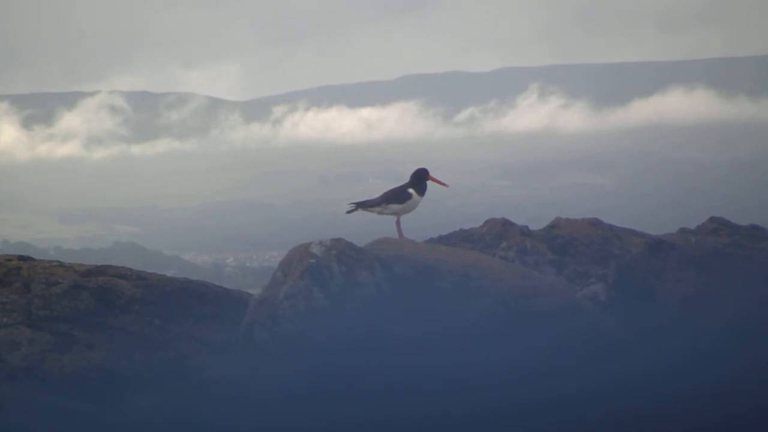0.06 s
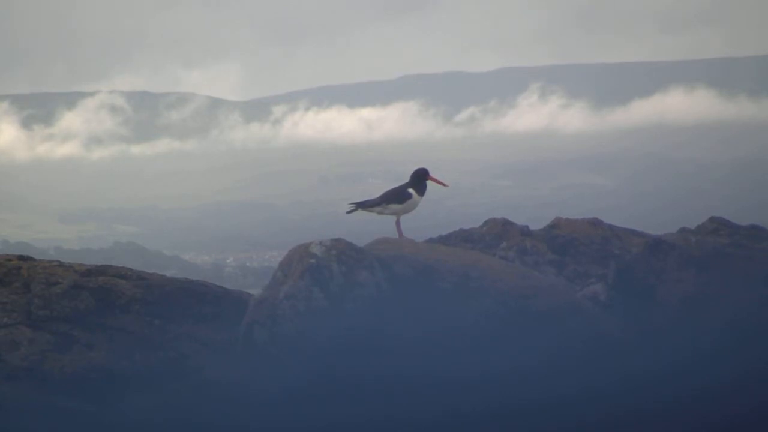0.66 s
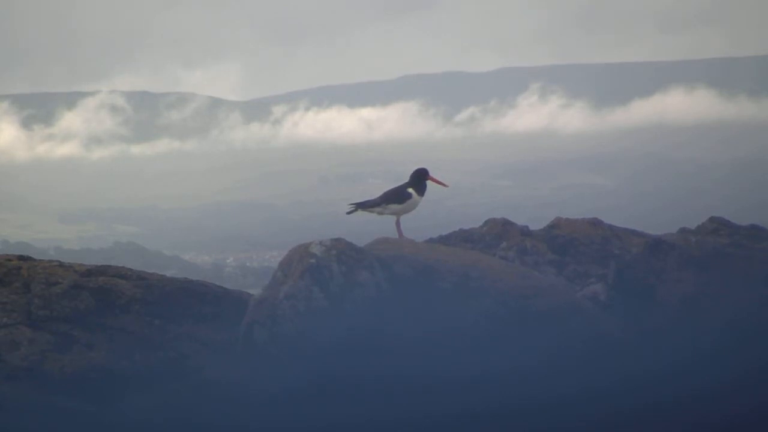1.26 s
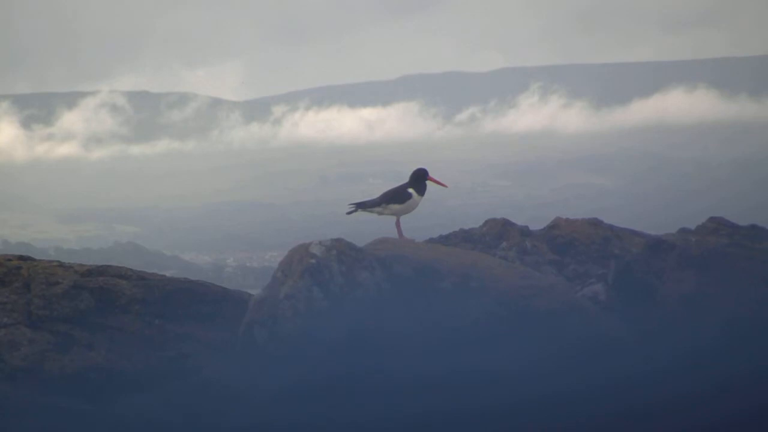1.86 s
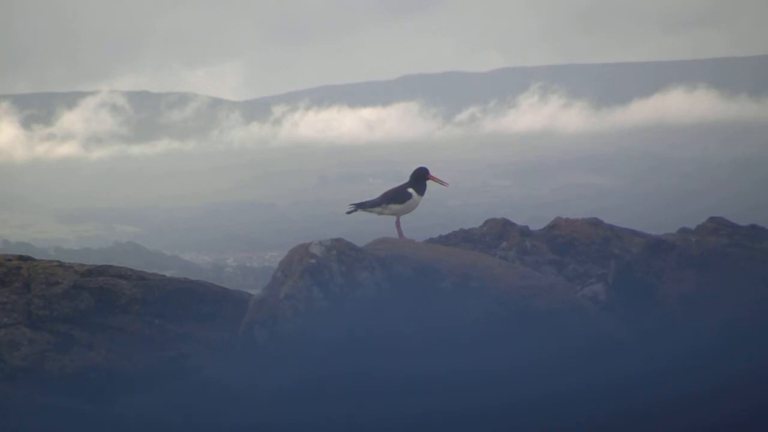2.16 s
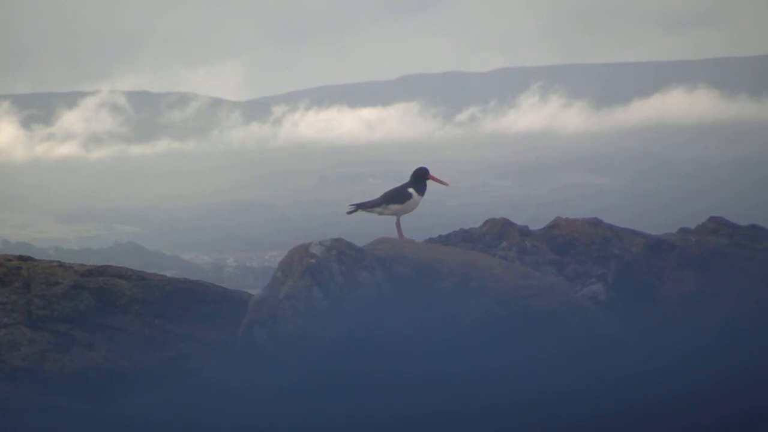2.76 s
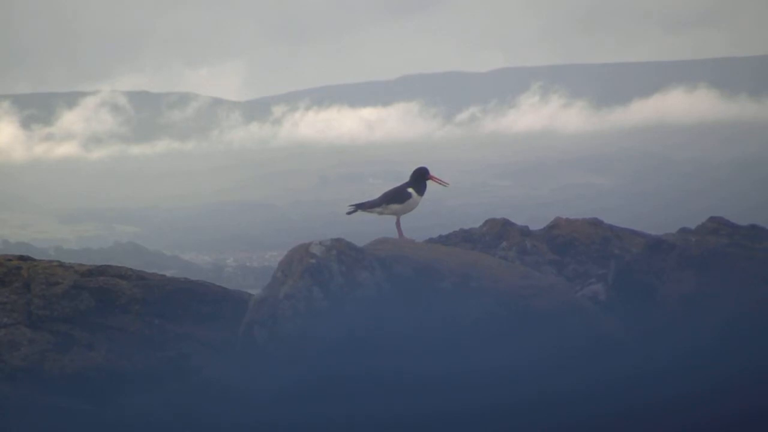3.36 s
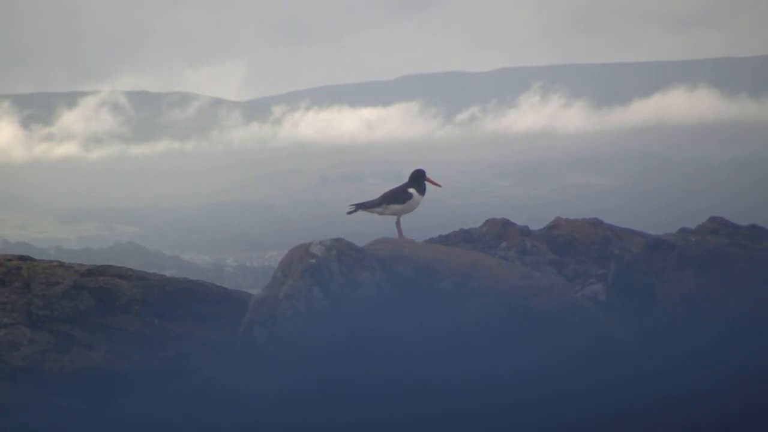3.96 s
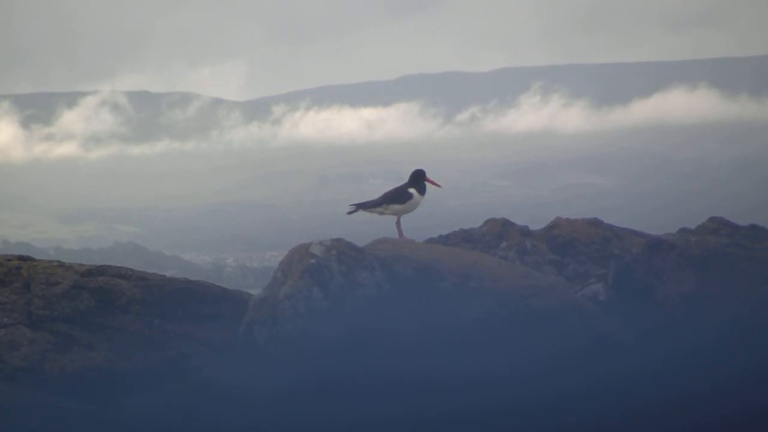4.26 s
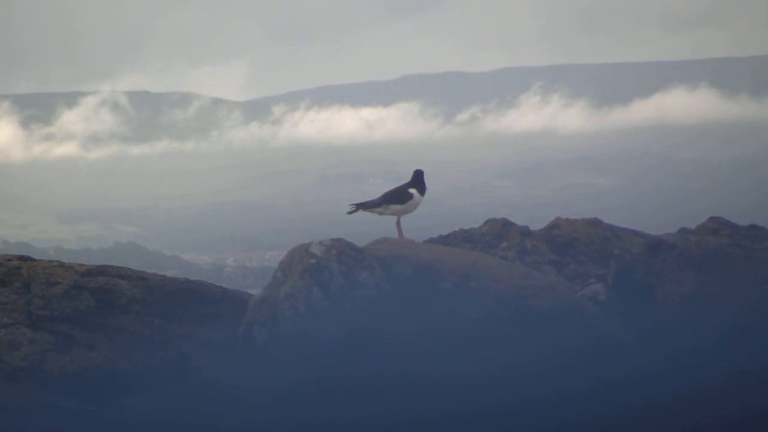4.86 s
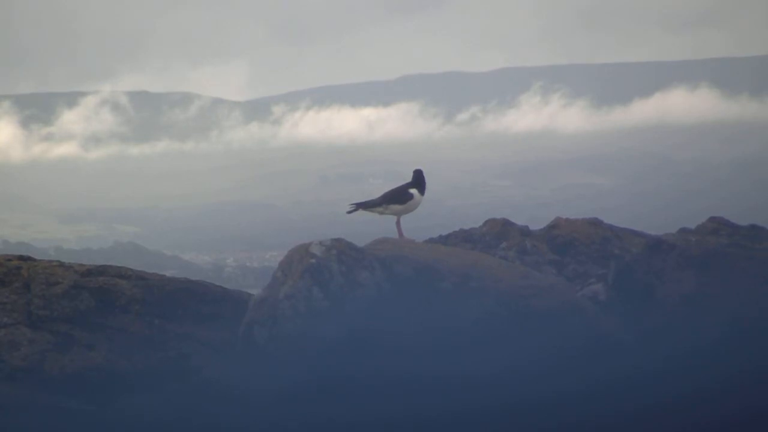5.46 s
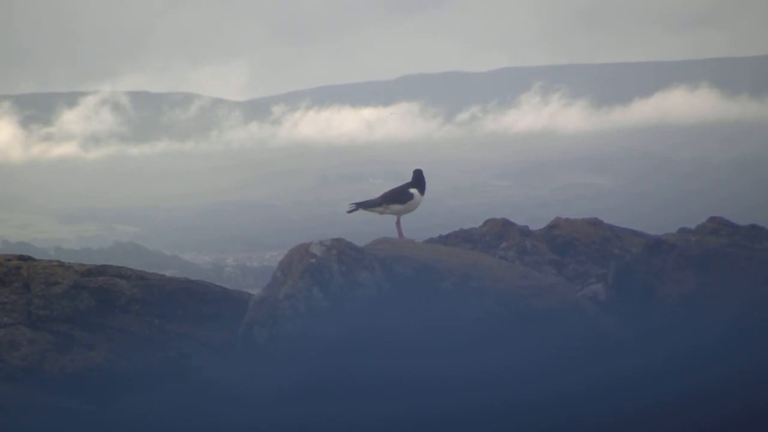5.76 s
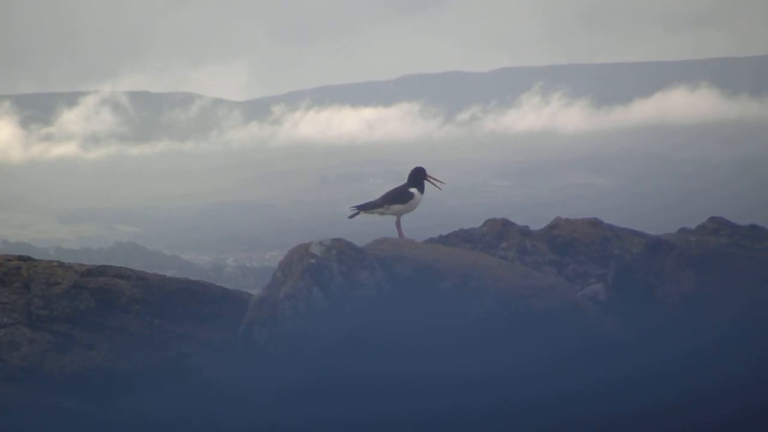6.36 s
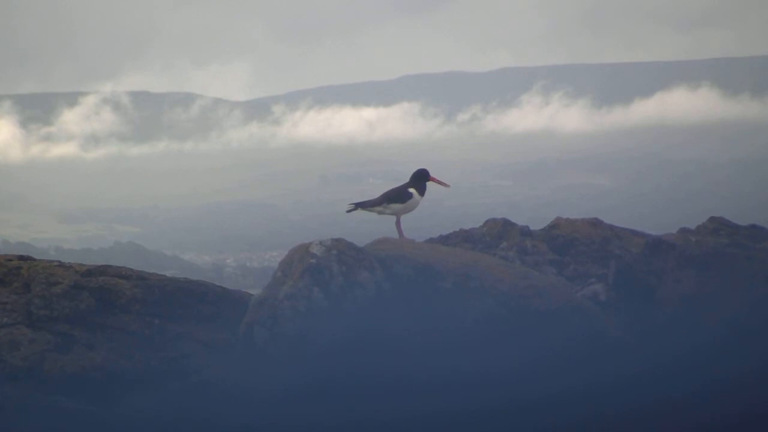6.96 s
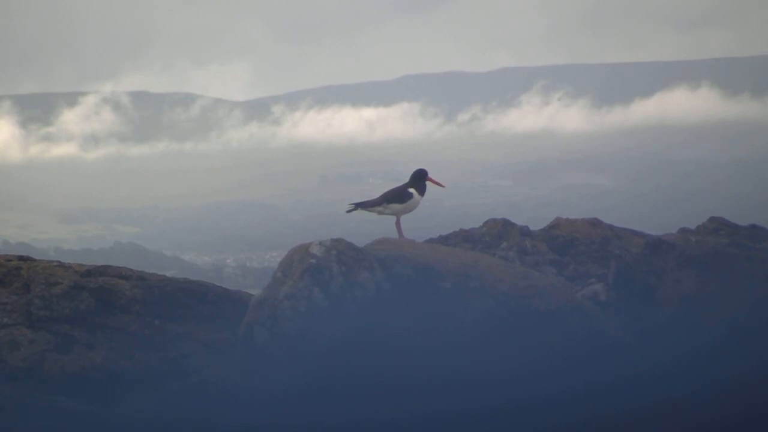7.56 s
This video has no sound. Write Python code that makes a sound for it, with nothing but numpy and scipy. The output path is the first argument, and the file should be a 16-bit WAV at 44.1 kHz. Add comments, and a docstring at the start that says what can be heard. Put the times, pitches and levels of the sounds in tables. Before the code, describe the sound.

A shore bird gives five brief, piercing whistled peeps outdoors, three in a loose group and two more after a pause, with a slight echo from the rocks. One soft knock falls between the second and third calls. Behind them a distant low rumble holds steady, with faint moving water, a few small drips and a light hiss. Near the end, air bumps the microphone once.

```python
"""Rocky shore. Low rumble, churn, faint wash and hiss throughout; small splashes from 0.25 s on.
From 2.1 s an oystercatcher pipes twice: its syrinx whistles an arch of pitch, its bill colours the
thin overtones, the rocks throw the calls back. At 3.0 s something knocks softly nearby and settles.
Three more calls follow at 3.4, 6.5 and 7.0 s. At 7.5 s, a low bump of air on the microphone."""
import sys
import numpy as np
from scipy import signal
from scipy.fft import rfft, irfft
from scipy.io import wavfile
from scipy.ndimage import uniform_filter1d

SR = 44100
rng = np.random.default_rng(int(sys.argv[2]) if len(sys.argv) > 2 else 0)


def log_audio(samples):
    """Write samples as a 16-bit WAV file to the path given in sys.argv[1]."""
    # one column per channel
    frames = np.atleast_2d(samples).T
    # limit to full scale, then quantise
    limited = np.clip(frames, -1, 1)
    pcm = np.round(limited * 32767).astype(np.int16)
    wavfile.write(sys.argv[1], SR, pcm)


N = 340452
TIME_S = np.arange(N) / SR

# background spectra: f/Hz, relative density/dB
RUMBLE_SPECTRUM = [(15, -17), (26, -9.5), (34, -16.5), (43, -3.5), (50.5, 1), (62, -4.5), (73, -1.5),
                   (87, -11.5), (112, -9.5), (155, -19), (192, -15), (225, -21.5), (370, -31), (500, -40),
                   (800, -54)]
WASH_SPECTRUM = [(350, 1), (560, -1), (700, 7), (870, 1.5), (1060, 4.5), (1290, -2), (1650, 1.5),
                 (2030, 2.5), (2300, -3.5), (3100, -2.5), (4300, -7.5), (6300, -15.5)]
# background envelopes: t/s, relative level/dB
RUMBLE_ENVELOPE = [(0, -26), (1, -27), (1.8, -25.5), (3.3, -26.5), (3.8, -27), (4.35, -26), (5.3, -26.5),
                   (6.2, -26.5), (7.72, -27)]
CHURN_ENVELOPE = [(0.0, -38), (0.08, -47), (0.41, -45.5), (0.43, -38), (0.58, -52.5), (3.27, -48),
                  (3.76, -42), (4.3, -54), (4.34, -47.5), (7.53, -50), (7.55, -43.5), (7.72, -43)]
WASH_ENVELOPE = [(0, -48.5), (.45, -49), (.6, -52), (2.2, -50.3), (3.15, -50.5), (3.35, -49.5), (3.8, -50),
                 (7.72, -51.2)]
# background, left against right: f/Hz, coherence/1
STEREO_COHERENCE = [(18, .75), (40, 1), (150, 0.99), (350, 0.98), (700, 0.87), (1500, 0.95), (3000, 0.92),
                    (6000, 0.23), (14000, 0.15)]
# background, left over right: f/Hz, level/dB
STEREO_BALANCE = [(30, -3.5), (80, -0.5), (160, 0.3), (600, 0), (6000, 1.6), (14000, -0.2)]
# background, left ahead of right: f/Hz, phase/rad
STEREO_LEAD = [(35, .6), (100, 0.32), (220, .16), (800, 0.066)]
# splashes, drips, gurgles: t/s, level/dB, centre/Hz, width/oct, duration/s
WATER_SPLASHES = [(0.251, -55.5, 2400, .6, 0.41), (0.462, -40, 400, 0.061, 0.055),
                  (0.631, -57.5, 5960, .4, 0.17), (1.753, -55, 2600, 0.58, 0.25),
                  (3.552, -41, 600, .5, .012), (4.375, -54, 5160, 0.37, 0.11),
                  (4.728, -44, 2000, 0.052, 0.02), (4.88, -60, 7000, .45, 0.084),
                  (5.264, -59, 7000, .45, .12), (6.106, -43, 3470, 0.17, 0.0044),
                  (6.171, -41, 418, 0.16, 0.05), (6.19, -44, 4400, 0.14, .004),
                  (6.63, -45, 2100, .08, .014), (7.522, -47, 4500, .5, 0.0038)]
# calls: t/s, level/dB, overtone gain/dB, length/s, climb end/s, climb width/s, climb target/Hz,
# drift target/Hz, upward voice break/Hz, break half-length/s
CALLS = [(2.0760, -12.4, 2.5, .0585, .0223, .0117, 3144, 3130, 318, .0092),
         (2.5809, -11.0, 1.5, .1410, .0508, .0178, 3079, 2838, 0, 0),
         (3.4246, -7.9, 1.2, .0727, .0394, .0139, 3225, 2953, 0, 0),
         (6.5080, -16.5, 0, .0486, .0188, .0091, 3185, 3380, 331, .0068),
         (6.9757, -10.9, 1.2, .0628, .0315, .0138, 3118, 3235, 0, 0)]
# overtone radiation of the open bill: f/Hz, gain/dB
BILL_RESPONSE = [(2800, 16), (4200, -14.5), (5200, -18.5), (5700, -31.5), (6400, -20.5), (7100, -33),
                 (7900, -23.5), (8800, -24), (10000, -43.5), (11000, -40), (12300, -27.5), (13500, -37),
                 (15400, -31)]
# boulder scatter, bright as the bill beams its overtones at the rocks: f/Hz, level/dB, t60/s
BOULDER_SCATTER = [(500, -23, 0.89), (2900, -26, 0.2), (3400, -20, 0.27), (6200, -9.5, 0.2),
                   (9000, -15, 0.22), (14000, -10, .13)]
# single rock reflections: delay/s, left/dB, right/dB
ROCK_ECHOES = [(0.0324, -27, -27), (.047, -27.5, -35)]
# knocks: t/s, level/dB, contact pitch/Hz
KNOCK_CONTACTS = [(2.966, -20.5, 2400), (2.972, -15.5, 1200)]
# modes of the knocked object: f/Hz, level/dB, t60/s
OBJECT_MODES = [(830, -21, 0.054), (1016, -15, 0.04), (1150, -17, 0.024), (1630, -16, 0.036),
                (1770, -11, 0.024), (1970, -6, 0.025), (2240, -25, .025), (2920, -15, 0.027),
                (3350, -33, .015), (9400, -12, .03)]
# air bumps: t/s, peak/dB, half-width/s
AIR_BUMPS = [(7.4779, -17.5, 0.0014)]


def amp(db):
    """dB to gain."""
    return 10 ** (np.asarray(db) / 20)


def unit_rms(x):
    """Scale to rms 1."""
    return x / np.sqrt(np.mean(x ** 2) + 1e-20)


def at_hz(points, hz):
    """Interpolate over log frequency."""
    f, value = np.transpose(points)
    return np.interp(np.log(hz + 1), np.log(f + 1), value)


def envelope(curve):
    """Gain per sample from rows of t/s, level/dB."""
    return amp(np.interp(TIME_S, *np.transpose(curve)))


def add(mix, start_s, sound):
    """Mix in place."""
    part = mix[..., max(round(start_s * SR), 0):][..., :sound.shape[-1]]
    part += sound[..., :part.shape[-1]]


def band(hz, centre_hz, width_oct):
    """Gaussian band over log frequency."""
    return np.exp(-.5 * (np.log2((hz + 1) / centre_hz) / width_oct) ** 2)


def stereo_noise(spectrum, drift_db, size=1024):
    """Shaped noise, rms 1, drifting in broad time-frequency patches."""
    hz = np.fft.rfftfreq(size, 1 / SR)
    a, b, c, d, drift = rng.standard_normal((5, 4 * N // size + 5, len(hz)))
    drift = unit_rms(uniform_filter1d(uniform_filter1d(drift, size=8, axis=0), size=24, axis=1))
    coherence = at_hz(STEREO_COHERENCE, hz)
    left = a + 1j * b
    right = coherence * left + np.sqrt(1 - coherence ** 2) * (c + 1j * d)
    pan = amp(at_hz(STEREO_BALANCE, hz) / 2)
    frames = np.array([left * pan * np.exp(1j * at_hz(STEREO_LEAD, hz)), right / pan])
    frames *= spectrum(hz) * amp(drift_db * drift)
    _, noise = signal.istft(frames.transpose(0, 2, 1), nperseg=size, noverlap=size - size // 4)
    return unit_rms(noise[:, :N])


def rumble(gain_db=-0.2):
    """Distant rumble, strongest near 50 Hz."""
    noise = stereo_noise(lambda hz: amp(at_hz(RUMBLE_SPECTRUM, hz)) / (1 + (hz / 900) ** 4),
                         drift_db=.5, size=16384)
    return amp(gain_db) * envelope(RUMBLE_ENVELOPE) * noise


def water(churn_db=-2.5, wash_db=4.0):
    """Moving water: narrow low churn, broad wash."""
    churn = stereo_noise(lambda hz: band(hz, 365, 0.3), drift_db=1.5)
    wash = stereo_noise(
        lambda hz: amp(at_hz(WASH_SPECTRUM, hz)) * hz / (hz + 150) / (1 + (hz / 7500) ** 4),
        drift_db=1.08)
    return (amp(churn_db) * envelope(CHURN_ENVELOPE) * churn
            + amp(wash_db) * envelope(WASH_ENVELOPE) * wash)


def hiss(level_db=-53.0):
    """Even, near-white microphone hiss."""
    return amp(level_db) * stereo_noise(lambda hz: 1 / np.sqrt(1 + hz / 40000), drift_db=0.6)


def splashes(spread=0.12):
    """Water meets rock: wide bands fizz, narrow ones ring like a bubble."""
    out, hz = np.zeros((2, N)), np.fft.rfftfreq(SR, 1 / SR)
    for centre_s, level_db, centre_hz, width_oct, duration_s in WATER_SPLASHES:
        fizz = irfft(rfft(rng.standard_normal((3, SR))) * band(hz, centre_hz, width_oct))
        swell = np.exp(-2 * ((TIME_S[:SR] - .5) / duration_s) ** 2)
        splash = unit_rms(swell * (fizz[0] + spread * fizz[1:]))
        splash *= amp(level_db) * np.sqrt(np.mean(swell ** 2))
        add(out, centre_s - .5, splash[:, max(round((.5 - centre_s) * SR), 0):])
    return out


def call_arch(length_s, climb_s, width_s, high_hz, after_hz, break_hz, break_s,
              opening_hz=2620, scoop_s=.0019, drop_s=.0127, accent_db=2.5, accent_s=0.02,
              break_lag_s=.0086, after_break_db=-3, effort_db_per_oct=47.5):
    """Pitch/Hz and relative level/dB: scoop, climb, optional break, drop. Louder with pitch to high_hz."""
    t = np.arange(0, length_s, 1 / SR)
    foot_hz = np.where(t < climb_s, opening_hz, after_hz)
    hz = foot_hz + (high_hz - foot_hz) * np.exp(-((t - climb_s) / width_s) ** 2)
    hz *= 1 - .4 * np.exp(-t / scoop_s)
    hz *= 1 - .426 * np.exp((t - length_s) / drop_s)  # the bird lets go
    db = accent_db * np.exp(-t / accent_s)
    if break_hz:
        from_break = (t - climb_s - break_lag_s) / break_s
        broken = np.exp(-from_break ** 8)
        hz += break_hz * broken
        db += after_break_db * (from_break > 0) * (1 - broken)
    return hz, db + effort_db_per_oct * np.log2(np.minimum(hz / high_hz, 1))


def whistle(pitch_hz, level_db, bright_db, jitter=0.0022, flutter_db=0.48, growth=0.63, pivot_db=-16,
            pan_db=1.0, overtone_pan_db=2.0, lead_s=12e-6, scatter=0.53, top_db=-7):
    """One call: the syrinx whistles, the bill colours overtones 2-6."""
    noise = rng.standard_normal((2, len(pitch_hz)))
    waver = unit_rms(signal.oaconvolve(noise, np.hanning(160)[None], "same", axes=1))
    hz = pitch_hz * (1 + jitter * waver[0])
    db = level_db + flutter_db * waver[1]
    sides = np.array([[.5], [-.5]])  # left earlier and louder
    phase = 2 * np.pi * (np.cumsum(hz) / SR + hz * lead_s * sides)
    voice = amp(db + pan_db * sides) * np.sin(phase)
    # overtones swell less than the fundamental: reedier ends
    overtone_db = pivot_db + growth * (db - pivot_db) + bright_db + overtone_pan_db * sides
    for k in range(2, 7):
        # short paths off rough rock fade each gliding overtone in and out, per ear
        delays_s = rng.uniform(.0003, .004, (4, 1, 1)) + rng.uniform(0, .00008, (4, 2, 1))
        reflected = np.sin(k * (phase - 2 * np.pi * hz * delays_s)).sum(0) / np.sqrt(len(delays_s))
        gain = amp(overtone_db + at_hz(BILL_RESPONSE, k * hz) + (k > 4) * top_db)
        voice += gain * (k * hz < SR / 2) * (np.sin(k * phase) + scatter * reflected)
    return np.sqrt(2) * voice * signal.windows.tukey(len(hz), .04)


def oystercatcher(gain_db=0.03):
    """Five piping calls, each whistled along its own arch."""
    out = np.zeros((2, N))
    for start_s, level_db, bright_db, *shape in CALLS:
        hz, db = call_arch(*shape)
        add(out, start_s, whistle(hz, level_db + db, bright_db))
    return amp(gain_db) * out


def shore_echoes(direct, far_db=-35, far_t60_s=3.7, onset_s=0.014, spread=0.46, taps_per_s=2000):
    """Two rock faces, dense boulder scatter and a faint far tail; response 1 s long."""
    t = TIME_S[:SR]
    taps = rng.standard_normal((3, SR)) * (rng.random((3, SR)) < taps_per_s / SR)
    taps = (taps[0] + spread * taps[1:]) * (1 - np.exp(-t / onset_s))
    bands = np.array(BOULDER_SCATTER)
    hz, frame_s, frames = signal.stft(taps, SR, nperseg=256)
    frames *= amp(-60 * frame_s / at_hz(bands[:, ::2], hz)[:, None])
    decay = unit_rms(signal.istft(frames, SR, nperseg=256)[1][:, :SR])
    colour = amp(at_hz(bands[:, :2], np.fft.rfftfreq(SR, 1 / SR)))
    near = irfft(rfft(decay) * colour)
    far = amp(far_db) * unit_rms(taps * amp(-60 * t / far_t60_s))
    response = (near + far) / np.sqrt(SR)
    for delay_s, left_db, right_db in ROCK_ECHOES:
        add(response, delay_s, amp([[left_db], [right_db]]))
    return signal.fftconvolve(direct, response, axes=1)[:, :N]


def knocks(width_oct=1.1, attack_s=.0005):
    """Each contact rings the same modes, favouring those near its pitch."""
    out, t = np.zeros(N), TIME_S[:SR // 6]
    hz, db, t60_s = np.transpose(OBJECT_MODES)[:, :, None]
    for start_s, level_db, contact_hz in KNOCK_CONTACTS + rattle():
        phase = 2 * np.pi * (hz * t + rng.random(hz.shape))
        modes = amp(db - 60 * t / t60_s) * band(hz, contact_hz, width_oct) * np.sin(phase)
        add(out, start_s, amp(level_db) * modes.sum(0) * (1 - np.exp(-t / attack_s)))
    return out


def rattle(count=5, gap_s=.008, uneven=.12, level_db=-28, contact_hz=2050, spread_oct=.2):
    """Light, uneven contacts as the object settles; rows as in KNOCK_CONTACTS."""
    last_s = KNOCK_CONTACTS[-1][0]
    return [(last_s + gap_s * (k + 1 + uneven * late), level_db, contact_hz * 2 ** (spread_oct * detune))
            for k, (late, detune) in enumerate(rng.standard_normal((count, 2)))]


def air_bump():
    """Short push and pull of air on the microphone."""
    return sum(amp(db) * (at_s - TIME_S) / width_s * np.exp(.5 - .5 * ((TIME_S - at_s) / width_s) ** 2)
               for at_s, db, width_s in AIR_BUMPS)


def scene():
    """Calls and knocks with echoes, over the shore background."""
    direct = oystercatcher() + knocks()
    return direct + shore_echoes(direct) + splashes() + air_bump() + rumble() + water() + hiss()


def record(dry):
    """Band limit: 15.4 kHz low-pass."""
    lowpass = signal.firwin(511, 15400, window=("kaiser", 9), fs=SR)
    return signal.oaconvolve(dry, lowpass[None], "same")


dry = scene()
out = record(dry)
log_audio(out)
```